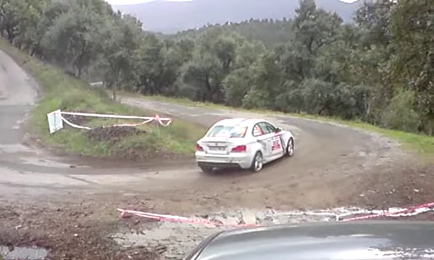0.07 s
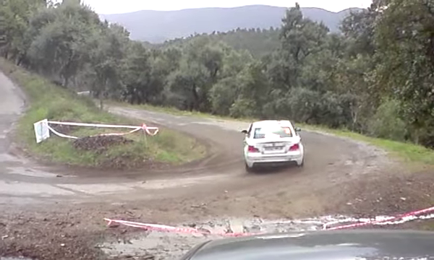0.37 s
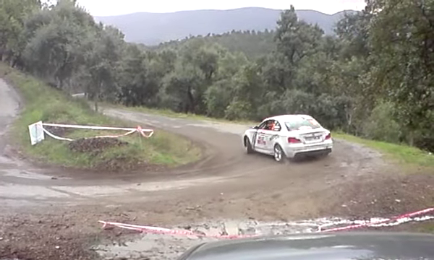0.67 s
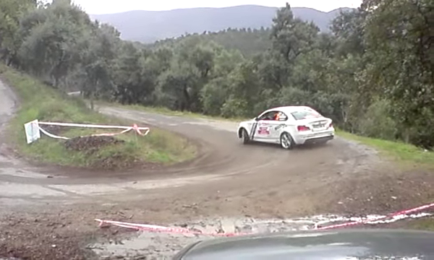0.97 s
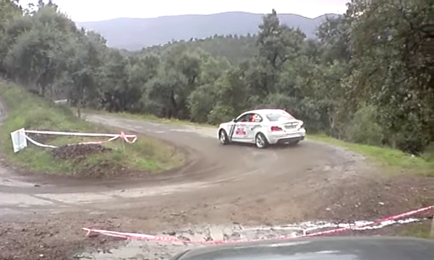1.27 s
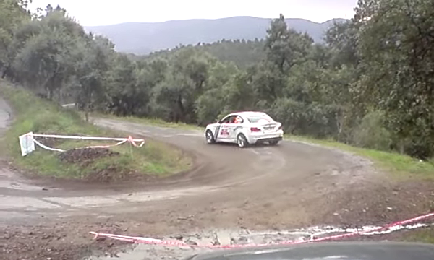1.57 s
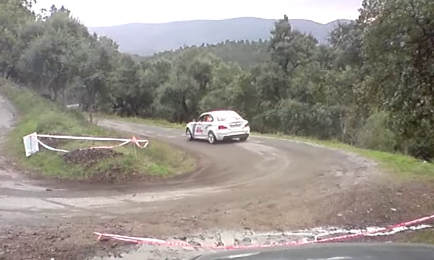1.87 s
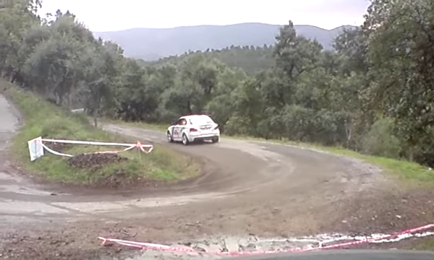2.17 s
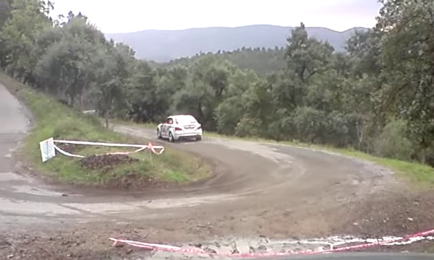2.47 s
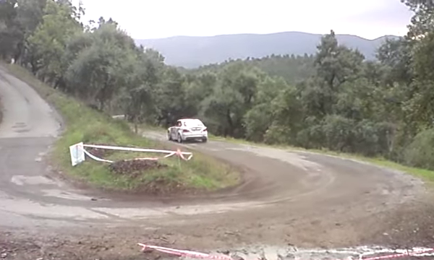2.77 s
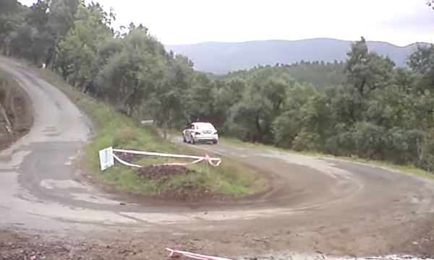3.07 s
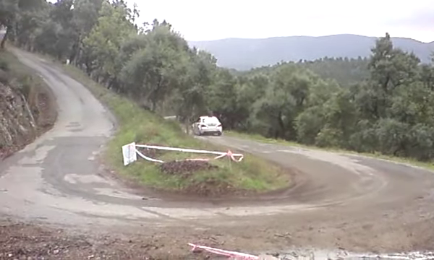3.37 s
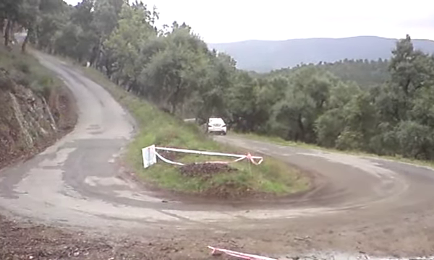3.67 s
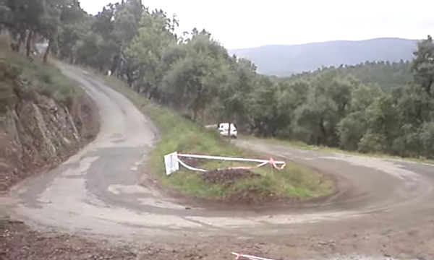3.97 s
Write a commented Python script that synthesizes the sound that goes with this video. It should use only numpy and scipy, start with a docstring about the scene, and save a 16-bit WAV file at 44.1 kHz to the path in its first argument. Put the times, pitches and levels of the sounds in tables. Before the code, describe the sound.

A rally car engine roars close by, revving up as its tyres scrub and throw gravel. Around 1 second the revs drop and the tyres howl briefly. From 1.5 seconds the engine climbs, loudest and raspiest near 2.5, with hissing grit and short stone scrapes. At about 2.8 seconds it cuts for a gear change and returns with a bang, then falls in pitch and fades with a slight outdoor echo.

```python
"""A gravel hairpin between trees and a bank: a rally car slides through, lifts, then pulls hard away.
Periodic firing gives the exhaust a few clean harmonics, under a rough roar and a rasp that puffs once
per firing. A gear change cuts the ignition, which returns with a bang. Sliding friction makes the
tyres scrub and howl, and they throw grit. Trees and bank scatter an echo; the loudest peaks clip."""
import sys
import numpy as np
from scipy import signal
from scipy.fft import rfft, irfft
from scipy.io import wavfile
from scipy.ndimage import uniform_filter1d

SR = 44100
rng = np.random.default_rng(int(sys.argv[2]) if len(sys.argv) > 2 else 0)


def dump(signal):
    """Clip the signal to [-1, 1] and save it as 16-bit WAV at the path in sys.argv[1]."""
    limited = np.clip(np.atleast_2d(signal).T, -1, 1)
    pcm = np.round(limited * 32767).astype(np.int16)
    wavfile.write(sys.argv[1], SR, pcm)


N = 176400

# Spectra give relative density; envelopes give level before any gain applied in the functions.
# Spectrum of the open air: f/Hz, level/dB
AIR_SPECTRUM = [(20, -16.5), (60, -18.5), (150, -4.5), (500, 1.5), (1500, -16.5), (8000, -38)]
# Envelope of the gravel spray from wheelspin: t/s, level/dB
SPRAY_ENVELOPE = [(0, -36.5), (.3, -35), (.52, -30.5), (.85, -35.5), (1, -55.5), (1.76, -54.5), (1.82, -34),
                  (2.1, -41.5), (2.45, -27.5), (2.7, -43), (2.8, -61), (4, -63.5)]
# Spectrum of the spray: f/Hz, level/dB
SPRAY_SPECTRUM = [(3000, -12.5), (5000, -2.5), (6000, -2.5), (7200, -8), (8500, -8)]
# Stones scraping under the tyres: t/s, level/dB, 1/e half-length/s
STONE_SCRAPES = [(0.514, -21, 0.022), (.835, -18.5, 0.0099), (1.376, -28.5, .016), (1.653, -30.5, 0.011),
                 (2.10, -19.5, 0.018), (2.405, -13, 0.012), (2.577, -18, .016), (3.036, -31, .025)]
# Envelope of the slide, for scrub and grit: t/s, level/dB
SLIDE_ENVELOPE = [(0, -17), (.3, -24), (.9, -19), (1.15, -27), (1.6, -25.5), (2.1, -23), (2.8, -33),
                  (4, -47)]
# Spectrum of the tyre scrub: f/Hz, level/dB
SCRUB_SPECTRUM = [(200, -16), (450, -9), (650, -6.5), (870, -3), (1020, -5), (1180, 1.5), (1450, -11),
                  (3000, -24.5)]
# Spectrum of the grit impacts: f/Hz, level/dB
GRIT_SPECTRUM = [(600, -14.5), (1500, 5.5), (3800, 5.5), (6000, -3), (8500, -31.5)]
# Tyre howl while the throttle is shut: t/s, f/Hz, level/dB
HOWL_TRACK = [(.9, 455, -42), (.98, 479, -28.5), (1.1, 494, -25), (1.19, 483.3, -25), (1.29, 460.7, -30),
              (1.4, 445.6, -52)]
# Spectrum of the crack at the gear change: f/Hz, level/dB
CRACK_SPECTRUM = [(150, -16), (400, 3), (900, -9), (1600, 1), (2800, -7), (4100, 0.5), (5200, -23),
                  (8000, -20)]
# Pipe resonances flaring under load: t/s, 1/e half-length/s, f/Hz, stage bandwidth/Hz, level/dB
PIPE_FLARES = [(0.073, 0.017, 1000, 500, -15.5), (0.152, 0.011, 860, 200, -16),
               (0.758, 0.063, 870, 200, -16), (0.807, 0.11, 1630, 540, -19), (2.054, 0.0051, 680, 500, -10),
               (2.332, .17, 830, 328.1, -15.5)]
# Spectrum of the exhaust roar: f/Hz, level/dB
ROAR_SPECTRUM = [(25, -37), (100, -37), (220, -23.5), (380, -12), (520, -3.5), (700, -0.5), (880, -2),
                 (1150, -4.5), (1500, -11), (2200, -29.5)]
# Envelope of the roar: t/s, level/dB
ROAR_ENVELOPE = [(0, -14), (.07, -17.5), (.24, -17.5), (.55, -16), (.78, -14.5), (.98, -18.5), (1.33, -20),
                 (1.6, -23.5), (1.95, -18), (2.22, -12.5), (2.42, -14.5), (2.56, -14), (2.62, -18),
                 (2.75, -19.5), (2.91, -25.5), (3.03, -22), (3.17, -25.5), (3.3, -27), (3.45, -30),
                 (3.85, -33.5), (4, -33)]
# Spectrum of the rasp's upper mids: f/Hz, level/dB
MIDS_SPECTRUM = [(800, -41), (1200, -4.5), (1380, 0.5), (1600, 0.5), (1950, -2), (2280, -1), (2700, -5.5),
                 (3100, -10.5), (4200, -25.5)]
# Envelope of the upper mids: t/s, level/dB
MIDS_ENVELOPE = [(0, -24), (.35, -23.5), (.65, -20.5), (.82, -24), (1, -30), (1.4, -29), (1.6, -36.5),
                 (1.9, -27), (2.2, -20.5), (2.5, -13.5), (2.65, -19.5), (2.75, -20), (2.9, -26.5),
                 (3.03, -26.5), (3.17, -29), (3.35, -28.5), (3.5, -32), (3.83, -36), (4, -32.5)]
# Spectrum of the rasp's treble: f/Hz, level/dB
TREBLE_SPECTRUM = [(2000, -25), (2900, -5), (3350, -1.5), (3900, -1.5), (4350, -2.5), (4900, -8.5),
                   (5500, -7.5), (6500, -13.5), (7500, -24), (8500, -36.5)]
# Envelope of the treble: t/s, level/dB
TREBLE_ENVELOPE = [(0, -25), (.5, -24.5), (.85, -23.5), (.99, -34.5), (1.2, -31.5), (1.38, -31),
                   (1.62, -36.5), (1.79, -30.5), (1.82, -30.5), (2.05, -25.5), (2.2, -19.5), (2.52, -19.5),
                   (2.74, -23), (2.9, -29), (3.05, -28), (3.17, -30.5), (3.35, -29), (3.5, -35.5),
                   (3.83, -37), (4, -34.5)]
# Envelope of a narrow ring heard behind the departing car: t/s, level/dB
RING_ENVELOPE = [(2.85, -49), (3.0, -40), (3.2, -27), (3.35, -30.5), (3.6, -35.5), (4, -33.5)]
# Firing rate of the engine: t/s, f/Hz
FIRING_RATE = [(0.0, 149.7), (0.1, 141.3), (0.17, 138.5), (0.3, 153.3), (0.5, 175.2), (0.6, 190.2),
               (0.7, 191.8), (0.83, 184.1), (0.95, 155), (1.06, 120.7), (1.12, 122), (1.35, 144.3),
               (1.5, 146.2), (1.76, 162.3), (2.03, 190.8), (2.25, 226.8), (2.47, 260.5), (2.68, 266.4),
               (2.76, 281.0), (2.87, 280), (3.0, 245.5), (3.1, 222.0), (3.25, 197.5), (3.45, 175.3),
               (3.65, 174.1), (3.82, 184.2), (3.95, 194.6), (4.0, 189.0)]
# Harmonics of the firing rate: t/s, level of order 1/dB, of order 2/dB, of order 3/dB
ORDER_ENVELOPES = [(0, -37, -45.5, -35.5), (0.25, -34.5, -22.5, -25.5), (0.4, -26, -22, -30.5),
                   (0.48, -25.5, -23.5, -15), (0.57, -25, -17.5, -28.5), (0.72, -29.5, -18, -16),
                   (0.87, -31, -27, -37), (1.02, -51, -38.5, -41), (1.3, -40.5, -29, -37),
                   (1.65, -40, -29, -30), (1.85, -28, -21.5, -24), (2.15, -31, -17, -16.5),
                   (2.5, -24, -21.5, -19), (2.63, -24, -23.5, -34), (2.75, -19.5, -19.5, -44),
                   (2.9, -30.5, -24.5, -43), (3.03, -28, -29, -40), (3.18, -33, -41, -49),
                   (3.28, -30, -30.5, -26), (3.5, -33, -40.5, -35.5), (3.83, -32.5, -39.5, -39),
                   (3.94, -31.5, -40, -29), (4, -31.5, -49, -32.5)]

CUT_S, RESUME_S, BANG_S = 2.751, 2.860, 2.858  # the gear change


def undb(db):
    """Amplitude ratio of a level in decibels."""
    return 10 ** (np.asarray(db) / 20)


def unit(x):
    """Normalisation to rms 1."""
    return x / np.sqrt(np.mean(x ** 2))


def times():
    """Uniform sampling instants in seconds."""
    return np.arange(N) / SR


def curves(table):
    """Linear interpolation of each column against time, the first column."""
    when, *columns = np.array(table, float).T
    return [np.interp(times(), when, column) for column in columns]


def noise():
    """Gaussian white noise."""
    return rng.standard_normal(N)


def colour(x, spectrum):
    """Spectral shaping, with steep skirts beyond the given points; rms 1."""
    hz, db = np.array(spectrum, float).T
    f = np.maximum(np.arange(N // 2 + 1) * SR / N, 1)
    gain = undb(np.interp(np.log(f), np.log(hz), db))
    skirts = np.minimum(f / hz[0], 1) ** 2 * np.minimum(hz[-1] / f, 1) ** 4
    return unit(irfft(rfft(x) * gain * skirts, N))


def drift(rate_hz):
    """Averaging noise twice leaves a smooth random fluctuation; rms 1."""
    span = max(int(SR / rate_hz), 1)
    return unit(uniform_filter1d(uniform_filter1d(noise(), span), span))


def resonance(hz, width_hz):
    """Forced response to noise of two identical resonant stages in series; rms 1."""
    b, a = signal.iirpeak(hz, hz / width_hz, fs=SR)
    return unit(signal.lfilter(b, a, signal.lfilter(b, a, noise())))


def swell(at_s, half_s):
    """Gaussian envelope with peak 1."""
    return np.exp(-((times() - at_s) / half_s) ** 2)


def open_air():
    """Stationary broadband noise forms the faint background."""
    return undb(-40.5) * colour(noise(), AIR_SPECTRUM)


def hillside_echo(car, delay_s=0.017, t60_s=0.41):
    """Scattering from trees and bank: convolution with an exponentially decaying diffuse tail."""
    t = times()
    tail = noise() * (t > delay_s) * np.exp(-np.log(1000) * t / t60_s)
    return undb(-17) * signal.fftconvolve(car, tail / np.sqrt(np.sum(tail ** 2)))[:N]


def gravel_spray(ticks_per_s=5700):
    """Shot noise: the impacts of fine gravel thrown by spinning wheels merge into a hiss."""
    ticks = (rng.random(N) < ticks_per_s / SR) * noise()
    return colour(ticks, SPRAY_SPECTRUM) * undb(curves(SPRAY_ENVELOPE)[0])


def stone_scrapes():
    """Friction on stones under the tyres excites short narrow-band screeches."""
    envelope = sum(undb(db) * swell(at_s, half_s) for at_s, db, half_s in STONE_SCRAPES)
    return envelope * resonance(hz=4000, width_hz=870)


def tyre_slide(stones_per_s=500):
    """Sliding friction gives a juddering scrub; flying grit adds randomly timed impulses."""
    scrub = colour(noise(), SCRUB_SPECTRUM) * undb(2 * drift(rate_hz=55))
    impacts = (rng.random(N) < stones_per_s / SR) * np.sign(noise())
    strength = undb(-np.minimum(rng.exponential(size=N), 5))
    grit = undb(-9) * colour(impacts * strength, GRIT_SPECTRUM)
    return undb(curves(SLIDE_ENVELOPE)[0]) * (unit(scrub) + grit)


def tyre_howl():
    """Frictional oscillation of the tyres: a brief tone wavering in pitch and level."""
    hz, db = curves(HOWL_TRACK)
    cycles = np.cumsum(hz * (1 + 0.011 * drift(rate_hz=78))) / SR
    return np.sqrt(2) * np.sin(2 * np.pi * cycles) * undb(db + 0.61 * drift(rate_hz=30))


def ignition_cut(fade_s=0.011, return_s=0.0034):
    """Gating with linear ramps: 1 while the ignition is off for the gear change, 0 while it fires."""
    t = times()
    return np.clip((t - CUT_S) / fade_s + .5, 0, 1) * np.clip((RESUME_S - t) / return_s, 0, 1)


def shift_bang(boom_hz=510, crack_delay_s=0.0033):
    """Impulsive excitation: unburnt fuel ignites in the pipe, a damped boom and then a crack."""
    def burst(start_s, rise_s):
        u = np.maximum(times() - start_s, 0) / rise_s
        return u * np.exp(1 - u)

    boom = burst(BANG_S, rise_s=.002) * np.sin(2 * np.pi * boom_hz * (times() - BANG_S))
    crack = burst(BANG_S + crack_delay_s, rise_s=0.0074) * colour(noise(), CRACK_SPECTRUM)
    return undb(-6.5) * boom + undb(-16) * crack


def pipe_flares():
    """Resonance: modes of the exhaust pipe swell briefly under load."""
    return sum(undb(db) * swell(at_s, half_s) * resonance(hz, width_hz)
               for at_s, half_s, hz, width_hz, db in PIPE_FLARES)


def firing_pulses(cycles, jitter_s=.0004, scatter_db=3):
    """Cycle-to-cycle variation: one impulse per firing, uneven in timing and strength."""
    fired = np.flatnonzero(np.diff(np.floor(cycles)))
    lateness, size = rng.standard_normal((N // 40, 2))[:len(fired)].T
    arrivals = np.clip(fired + (lateness * jitter_s * SR).astype(int), 0, N - 1)
    pulses = np.zeros(N)
    pulses[arrivals] = undb(scatter_db * np.tanh(size))
    return pulses


def exhaust_roar(cycles, pulse_share=0.38, puff_depth=0.15, cut_fall_db_per_s=25):
    """Source and filter: uneven firings ring the pipe and modulate the rasp of the escaping gas."""
    puff = 1 + puff_depth * np.cos(2 * np.pi * cycles)
    roar = pulse_share * colour(firing_pulses(cycles), ROAR_SPECTRUM)
    roar += np.sqrt(1 - pulse_share ** 2) * colour(puff * noise(), ROAR_SPECTRUM)
    roar *= undb(curves(ROAR_ENVELOPE)[0] + 1.46 * drift(rate_hz=47))
    mids = colour(puff * noise(), MIDS_SPECTRUM)
    mids *= undb(curves(MIDS_ENVELOPE)[0] + 1 + .5 * drift(rate_hz=40))
    treble = colour(puff * noise(), TREBLE_SPECTRUM)
    treble *= undb(curves(TREBLE_ENVELOPE)[0] + 1 + 1.2 * drift(rate_hz=50))
    ring = resonance(hz=1360, width_hz=180) * undb(curves(RING_ENVELOPE)[0])
    cut_db = ignition_cut() * (-4.5 - cut_fall_db_per_s * (times() - CUT_S))
    return (roar + mids + treble + ring) * undb(cut_db)


def exhaust_note(cycles, firing_hz, pipe_hz=860, half_width_hz=59):
    """Harmonic series of the firing rate; a pipe resonance lifts orders 4 and 5 as they cross it."""
    def lift_db(order):
        return 4 / (1 + ((order * firing_hz - pipe_hz) / half_width_hz) ** 2)

    first, second, third = curves(ORDER_ENVELOPES)
    levels = [first, second, third, third - 11.5 + lift_db(4), third - 20.5 + lift_db(5)]
    note = np.zeros(N)
    for order, db in enumerate(levels, 1):
        flutter_db = 1.22 * drift(rate_hz=35)
        note += undb(db + flutter_db) * np.sin(2 * np.pi * (order * cycles + rng.random()))
    return np.sqrt(2) * note * undb(0.73 - 21 * ignition_cut())


def scene():
    """Superposition of the car, its echo and the open air, in one channel."""
    firing_hz, = curves(FIRING_RATE)
    cycles = np.cumsum(firing_hz * (1 + 0.00456 * drift(rate_hz=30))) / SR  # one cycle per firing
    car = exhaust_note(cycles, firing_hz) + exhaust_roar(cycles) + pipe_flares()
    car += gravel_spray() + shift_bang() + tyre_slide() + tyre_howl() + stone_scrapes()
    return (car + hillside_echo(car) + open_air())[None]


def record(dry, clip_level=.95, top_hz=8043):
    """Saturation and band limiting: the loudest peaks clip, then a low-pass removes the top."""
    low_pass = signal.ellip(8, .2, 70, top_hz, fs=SR, output="sos")
    return signal.sosfilt(low_pass, np.clip(dry, -clip_level, clip_level))


dry = scene()
out = record(dry)
dump(out)
```